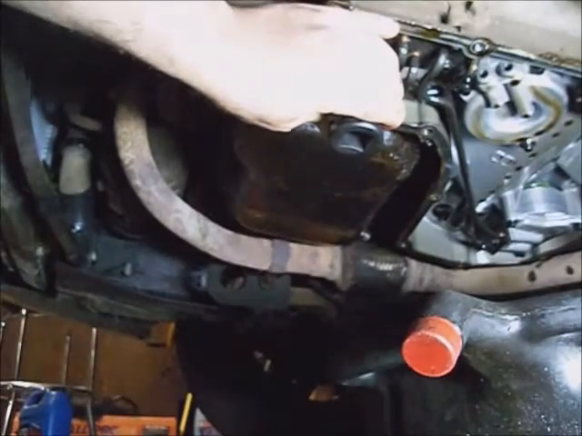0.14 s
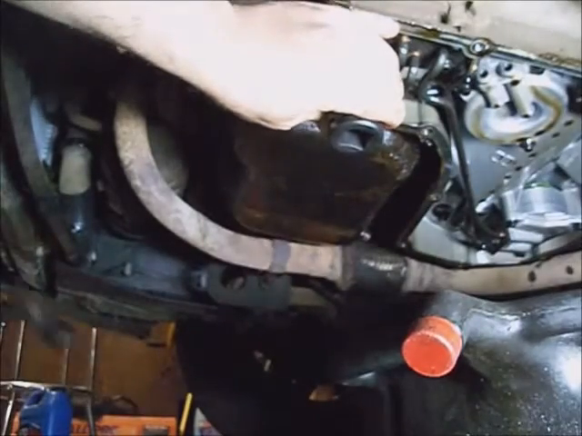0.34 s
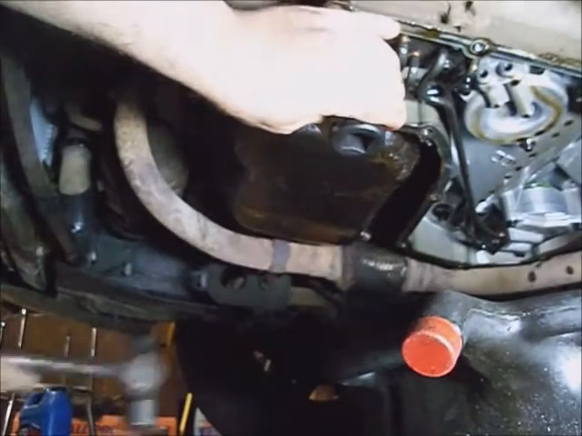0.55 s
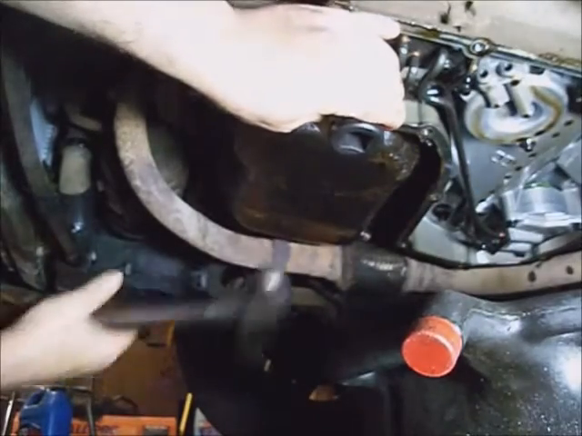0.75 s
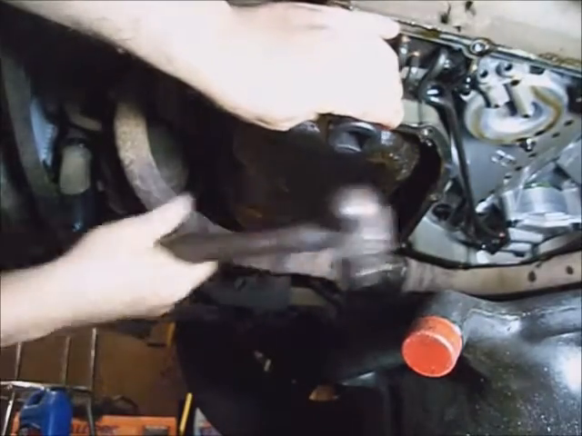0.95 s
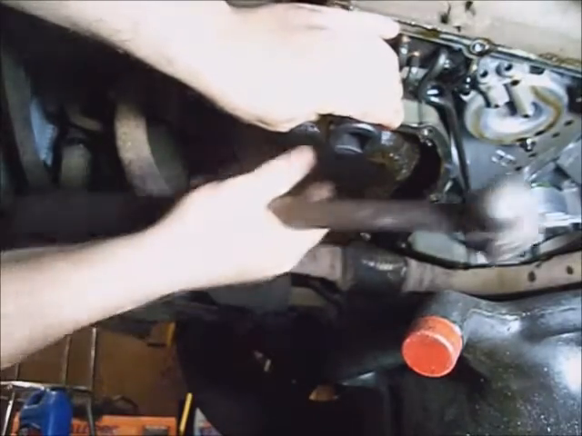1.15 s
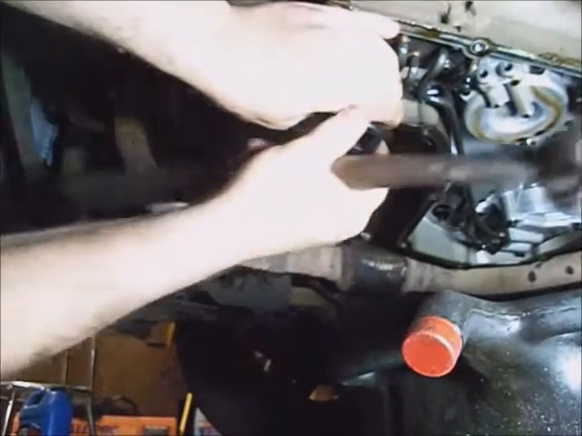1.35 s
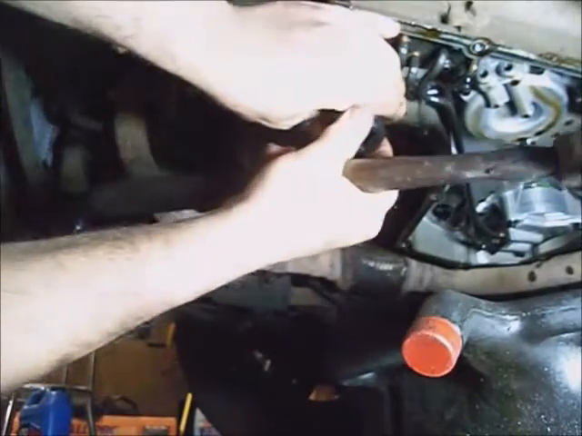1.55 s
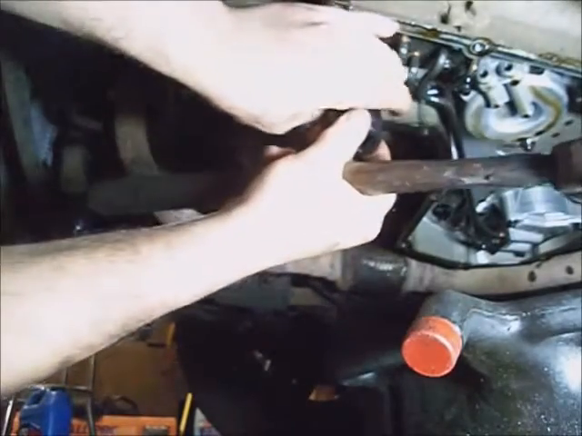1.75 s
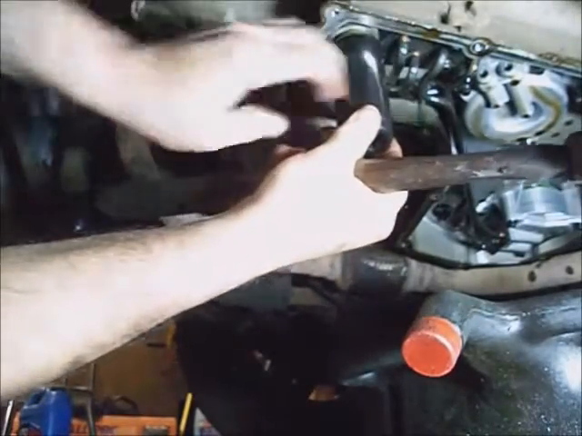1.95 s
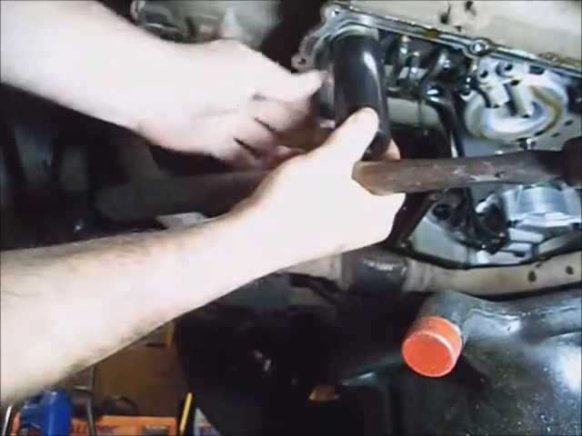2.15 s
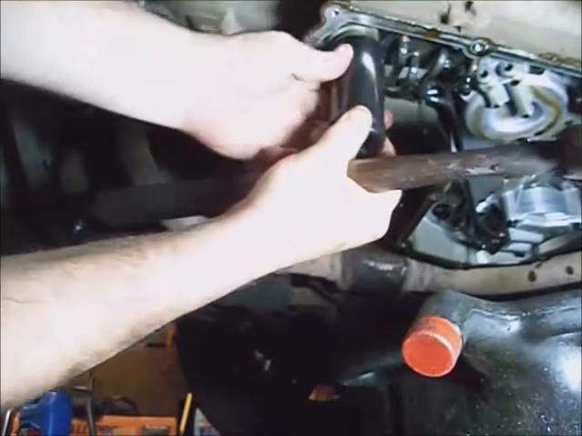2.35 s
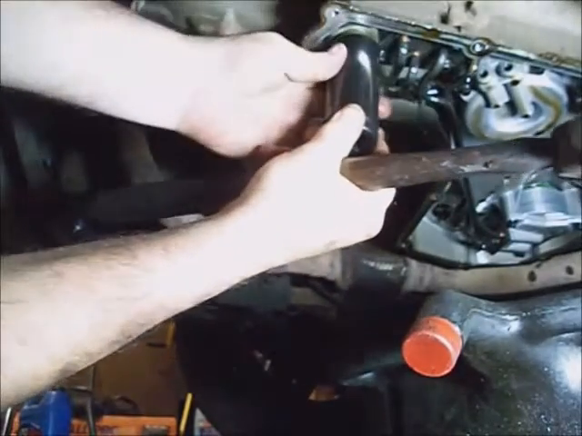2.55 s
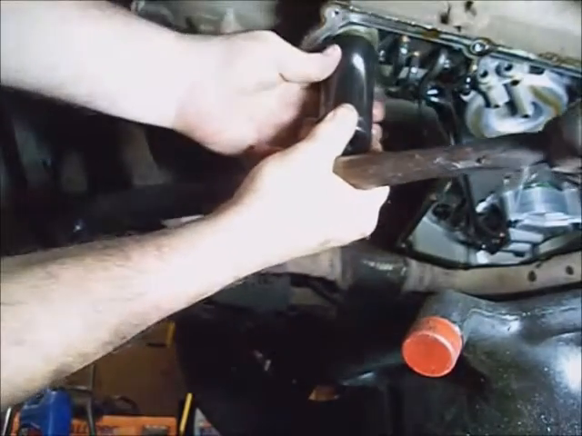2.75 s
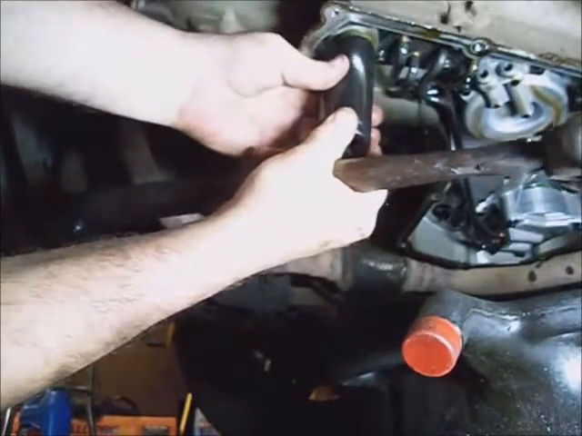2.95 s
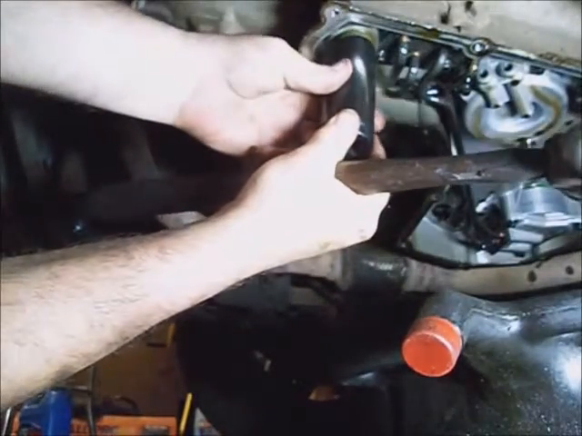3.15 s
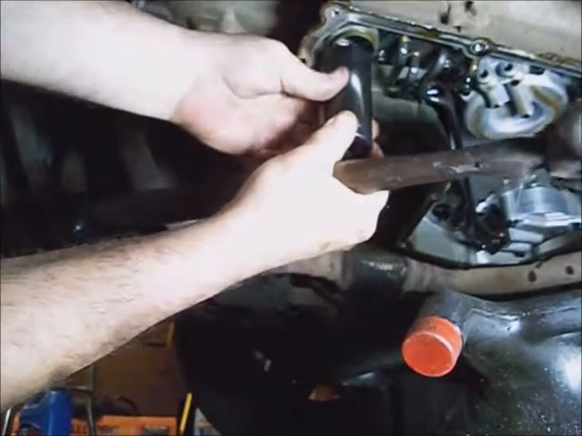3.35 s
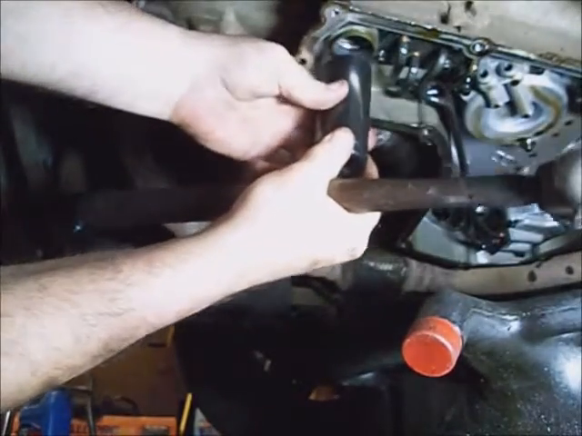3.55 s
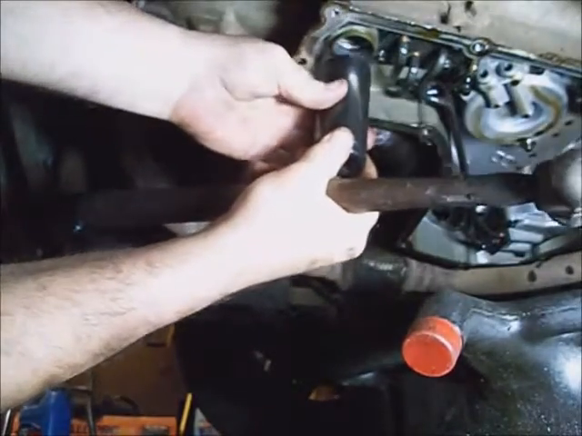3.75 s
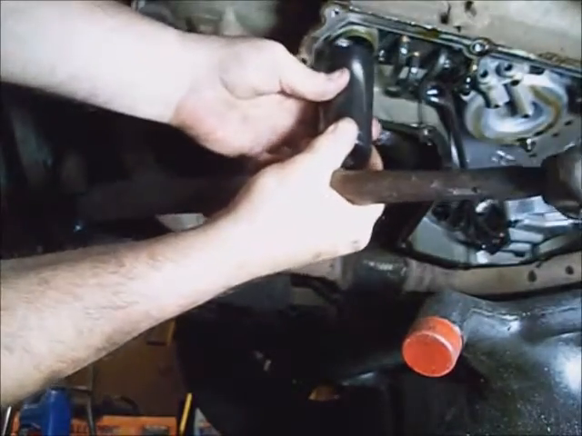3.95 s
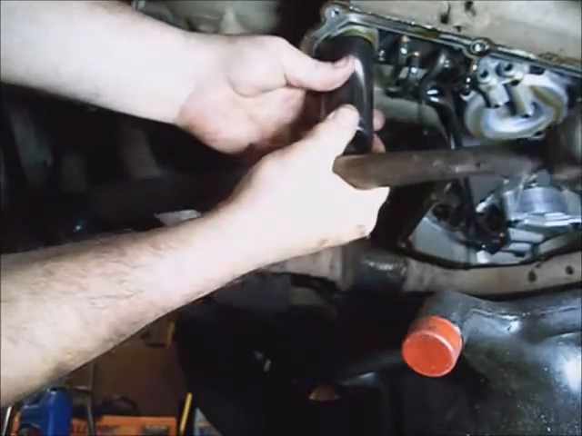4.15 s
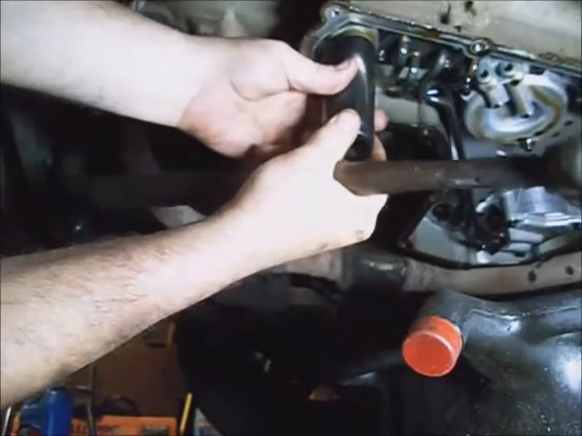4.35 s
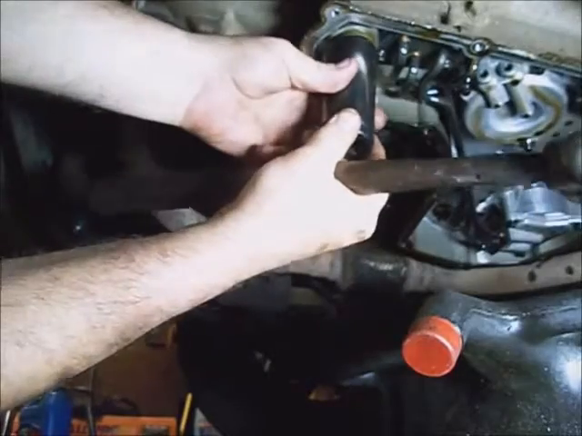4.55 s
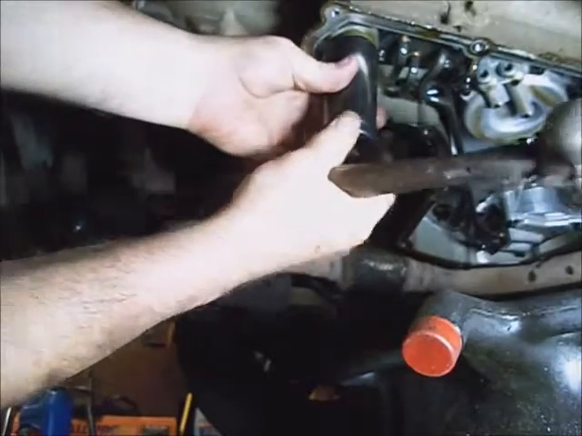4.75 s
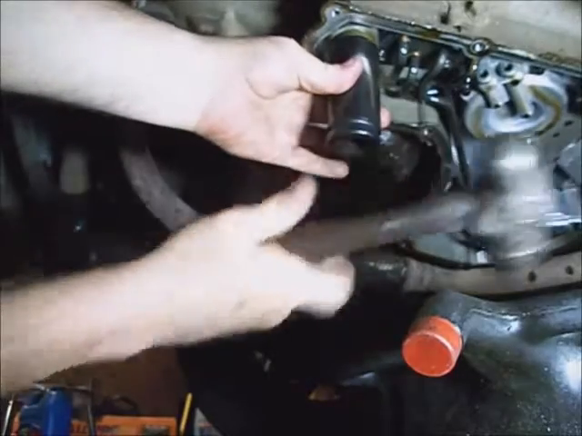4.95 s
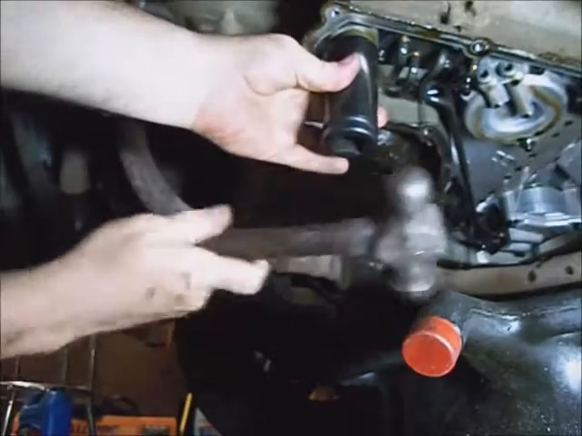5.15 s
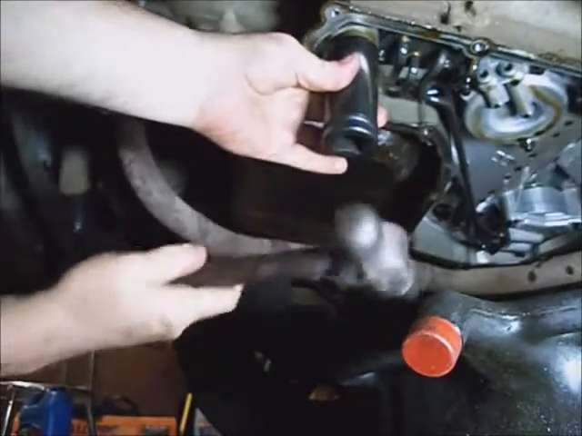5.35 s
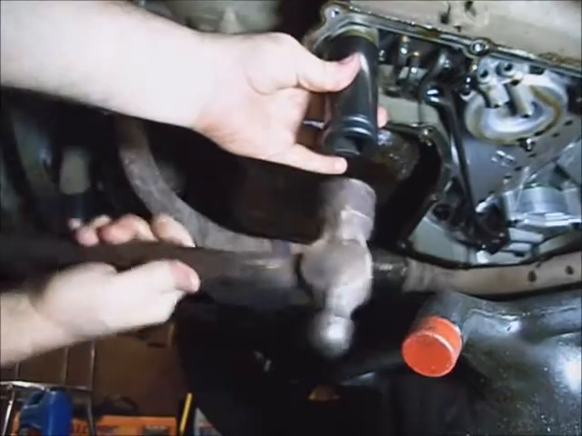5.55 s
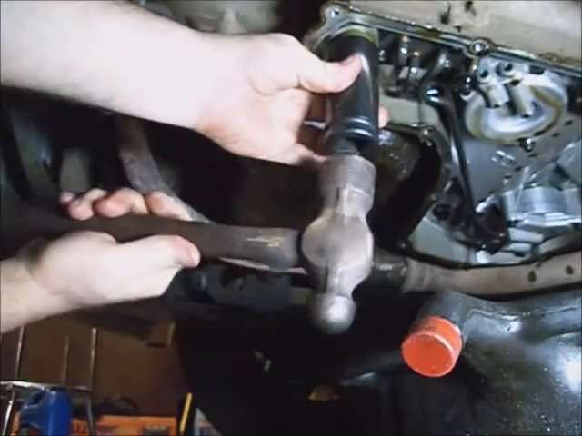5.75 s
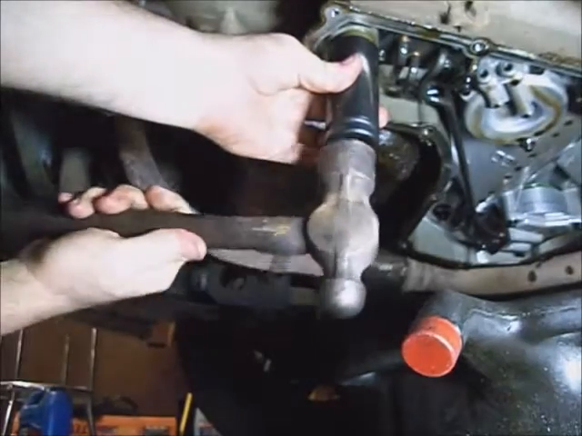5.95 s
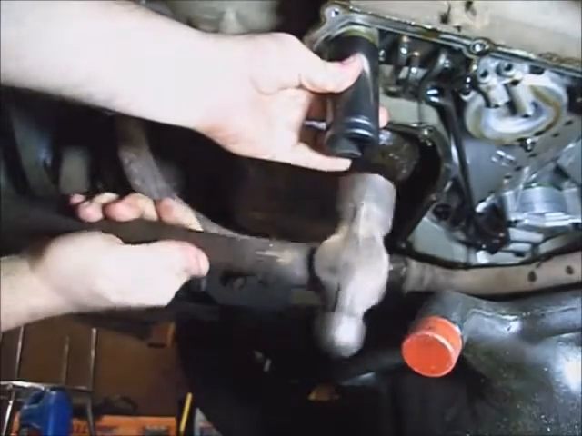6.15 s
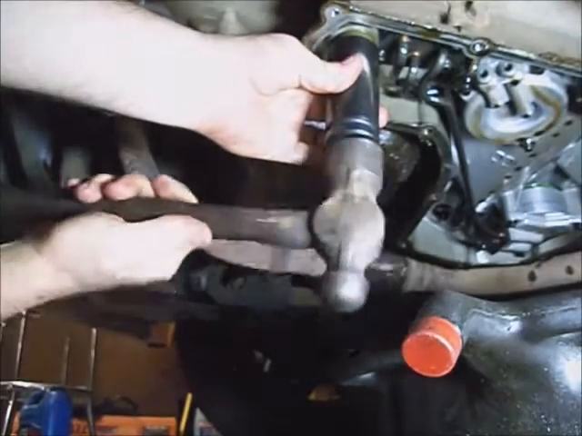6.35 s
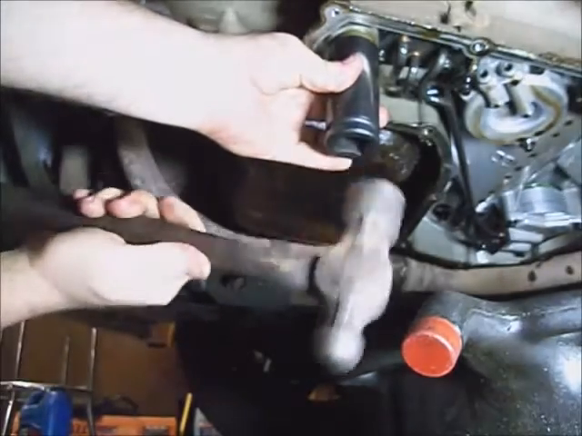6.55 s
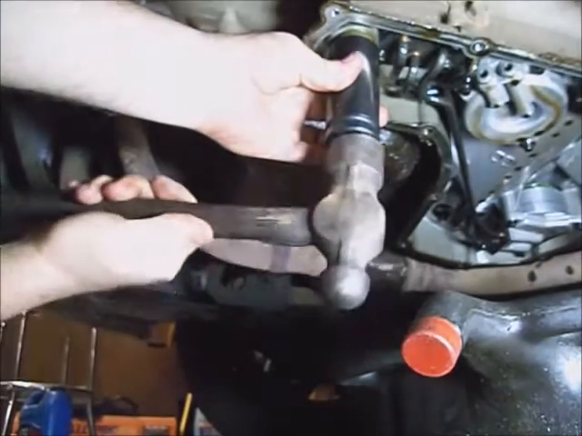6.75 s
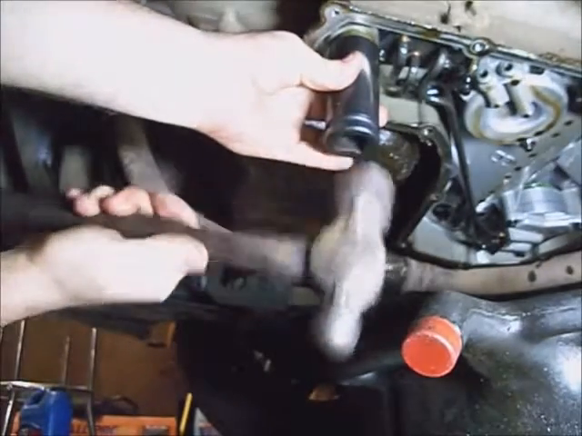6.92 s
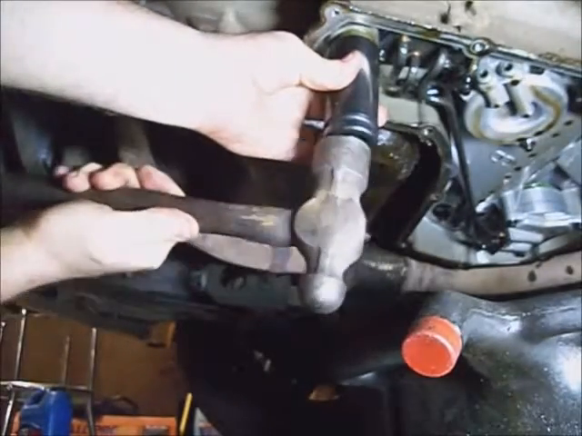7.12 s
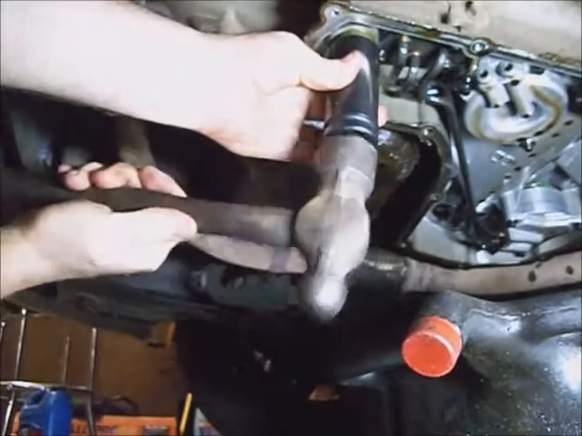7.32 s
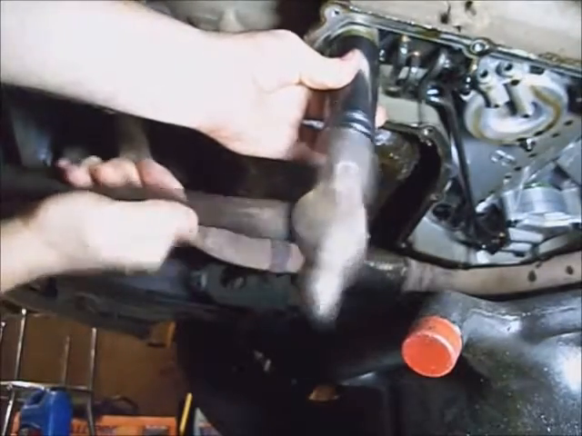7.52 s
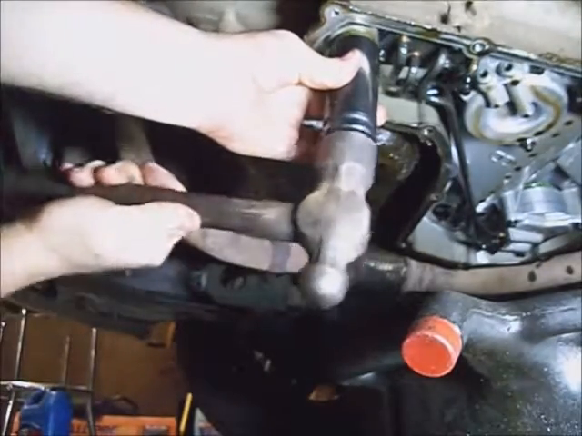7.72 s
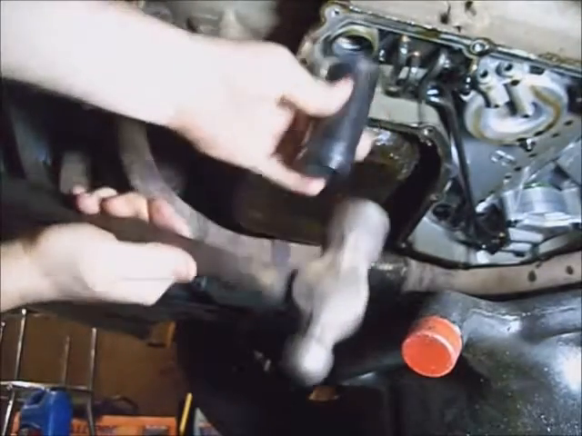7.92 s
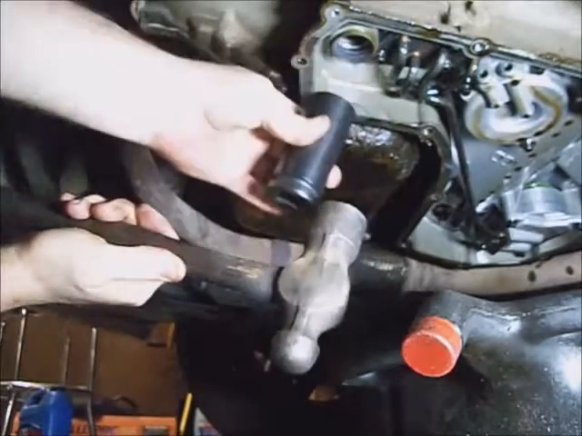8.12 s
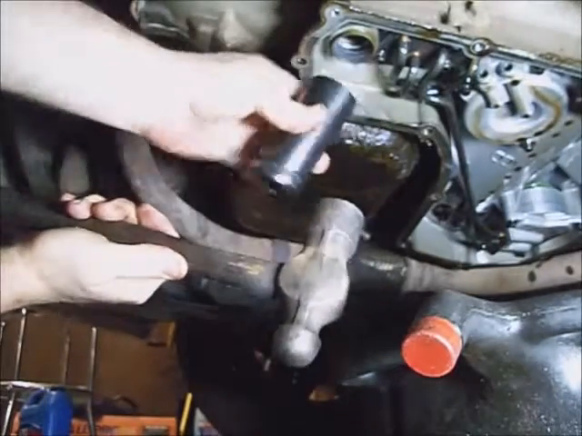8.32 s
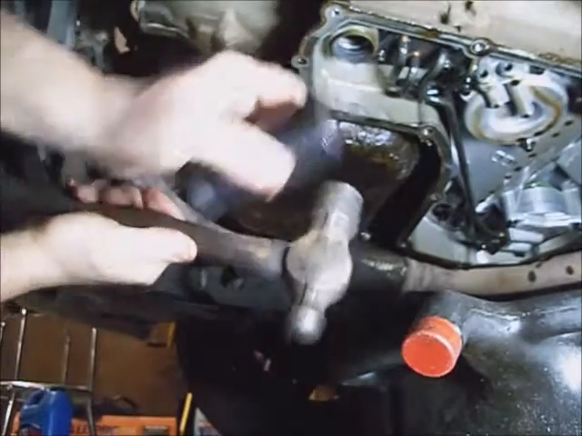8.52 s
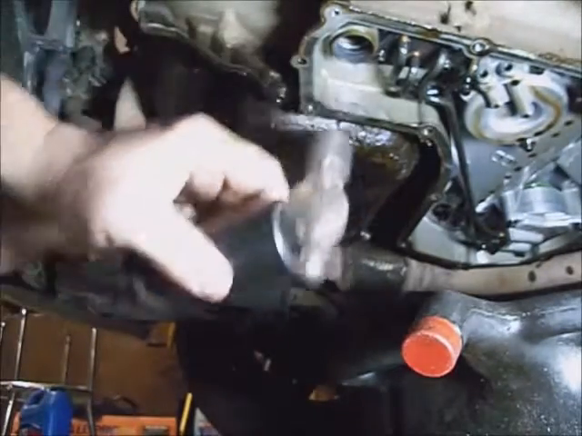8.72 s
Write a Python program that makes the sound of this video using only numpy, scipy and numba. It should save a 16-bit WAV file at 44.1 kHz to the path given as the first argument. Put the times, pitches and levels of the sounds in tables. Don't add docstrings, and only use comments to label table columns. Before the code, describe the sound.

Constant soft, band-limited hiss with a slightly resonant, boxy colour fills a garage, heard by a small close microphone. At about 0.3 s a tool knocks loudly on metal, rattling and bouncing for a tenth of a second while the car body shudders low; a dull bump follows at 0.6. From 0.6 to 3.3 s there are faint brushes of sleeves and hands, with tiny nudges near 1.4, 2.1, 2.6 and 3.0. A clearer short tap comes at 4.2, with light rubbing after. At 5.2 a strong, low panel thud. Then four hammer blows on a steel socket: 6.4 clacky and bright, 6.75 more ringing, 7.2 harder, 7.6 firmest and sharpest, all short, overloaded, with brief room echo. A small light clink at 8.2, a barely audible touch at 8.6, and hiss to the end.

```python
import sys
import numpy as np
from scipy import signal
from scipy.fft import rfft, irfft, next_fast_len
from scipy.io import wavfile
from scipy.ndimage import uniform_filter1d
from numba import njit

SR = 44100
rng = np.random.default_rng(int(sys.argv[2]) if len(sys.argv) > 2 else 0)


def put_to_file(sound):
    columns = np.atleast_2d(sound).T
    safe = np.clip(columns, -1, 1)
    whole_steps = np.round(safe * 32767)
    wavfile.write(sys.argv[1], SR, whole_steps.astype(np.int16))


def convert_level_to_amplitude(level_db):
    exponent = np.asarray(level_db, float) / 20
    return 10 ** exponent


N = 387198

# (frequency [Hz], level [dB per Hz])
HISS_SPECTRUM = [(15, -46.5), (40, -17.5), (91, -9.5), (206, -16), (303, -21.5), (626, -16.5), (800, -20),
                 (1500, -17), (1800, -19.5), (3200, -12.5), (3700, -5.5), (5700, -6.5), (6000, -14),
                 (6350, -54.5)]
# (centre [Hz], width [Hz], level [dB])
CASE_RESONANCES = [(1045, 200, 11), (2660, 220, 6), (3090, 64, 4.5), (3257, 47, 0), (3840, 110, 5),
                   (3925, 50, -8), (4140, 160, 7.5), (4306, 56, 7.5), (4525, 140, 6.5), (4720, 52, 5),
                   (4866, 90, -3), (5166, 60, 7.5), (5264, 100, -4.5), (5230, 54, 5), (5510, 52, 6.5)]
# (time [s], level [dB])
HISS_DRIFT = [(0.0, -44), (0.7, -46), (4.8, -46.5), (6.2, -45.5), (7.2, -46), (8.78, -45.5)]
# (start [s], length [s], level [dB])
BRUSH_STROKES = [(0.592, 0.21, -56), (1.078, 0.56, -52), (2.12, 0.56, -54.5), (3.002, 0.255, -57.5),
                 (4.3, 0.27, -61)]
# (band centre [Hz], t60 [s], level [dB])
ROOM_BANDS = [(45, 0.9, -7.5), (150, 0.43, -8), (398, 0.34, -5.5), (950, .4, -6), (2000, .3, -9),
              (4200, 0.16, -11)]

# (frequency [Hz], level [dB], t60 [s])
NUDGE_MODES = [(200.5, -16.5, 0.05), (290, -15, 0.15), (397.8, -15, 0.14), (529, -8.5, 0.12),
               (637, -8, 0.08), (810, -8.5, 0.061), (883, -5, 0.039), (1024, -6.5, 0.096),
               (1260, -9, 0.042), (1813, -9, 0.03), (2328, -12, 0.037)]
TOOL_MODES = [(90.2, -30, .3), (186.6, -24.5, 0.42), (248.7, -15.5, 0.14), (385, -6, .07), (621, -1, 0.045),
              (807, -3, 0.05), (1030, -5, 0.044), (1293, -1.5, 0.0404), (1620, -10.5, .03),
              (1952, -6.5, .035), (2356, -9, 0.0347), (2770, -13, 0.03), (3710, -10, .025),
              (4160, -12, 0.023), (4450, -10.5, 0.026), (5157, -12, .02), (5648, -15.5, .02)]
PANEL_MODES = [(59.7, -21, 0.22), (91, -7, .26), (138.3, -11.5, 0.25), (216.2, -0.5, 0.11),
               (255.6, 0, 0.04), (380, -17, 0.08), (537, -26.5, 0.085), (706, -22.5, 0.048),
               (930, -29.5, .05), (1400, -29, 0.033), (2590, -26.5, 0.033), (3770, -26.5, 0.033)]
TILTED_MODES = [(110.4, -22.5, .12), (214, -12, 0.085), (560, -10, 0.073), (881, -3, 0.065),
                (1004, -5.5, 0.051), (1395, -4.5, 0.035), (1720, -7, 0.036), (2140, 0, 0.024),
                (2350, 1, 0.026), (2625, -1, 0.044), (2900, -11.5, 0.034), (3290, 1, 0.018),
                (3645, -5.5, 0.026), (3913, -0.5, 0.019), (4450, -15.5, 0.026), (5290, -9.5, 0.024)]
LOOSE_MODES = [(93.9, -27, 0.089), (168.8, -25, .1), (248, -19, 0.1), (397, -11, .08), (530, -6.5, .07),
               (698, -15, 0.17), (767, -11, .07), (870, -5.5, 0.12), (1054, -3, .07), (1130, -9.5, 0.069),
               (1180, 3, 0.06), (1786, -6.5, .05), (2140, -6, 0.046), (2482, -9.5, .05),
               (2667, -8.5, 0.056), (3008, -8.5, 0.048), (3400, -6.5, 0.032), (3936, -6, .04),
               (4470, -13, .04), (4900, -11.5, .03), (5350, -16.5, .03)]
SEATED_MODES = [(219.4, -28.5, 0.099), (249.6, -30.5, 0.14), (622, -22, 0.065), (789, -18, 0.05),
                (882, 1, 0.047), (965, -9, 0.17), (1013, 5.5, 0.04), (1144, -14, .06), (1320, -19.5, 0.023),
                (1803, -7.5, 0.038), (2150, -13.5, 0.043), (2480, -6, 0.036), (2730, -14.5, .025),
                (3070, -12.5, 0.024), (3573, -2.5, 0.015), (3889, -1.5, 0.015), (4423, -17, 0.033),
                (4880, -16.5, 0.029), (5344, -12.5, 0.03)]
CLINK_MODES = [(228, -28, 0.06), (840, -23, .06), (1070, -22.5, 0.061), (1860, -13.5, 0.065),
               (2120, -12, 0.063), (2280, -4.5, 0.033), (2647, -6, .06), (2860, -10, 0.055),
               (3000, -11, .04), (3370, -4, 0.016), (3800, -5.5, 0.024), (4240, -2, 0.0093)]

# (time [s], peak level [dB], chatter length [s], brightness [dB per octave])
NUDGE_CONTACTS = [
    (.036, -45.5, 0.0019, -14),
    (1.44, -42, .006, -1),
    (2.13, -44, 0.0074, -3),
    (2.629, -43.5, .008, -9),
    (2.974, -35, 0.0066, -2),
    (3.03, -43.5, .006, -1.5),
    (4.2328, -27.5, 0.0019, -1),
    (8.56, -47.5, .008, -9),
]
TOOL_CONTACTS = [
    (0.2851, 2, 0.002, .3),
    (.297, -16, 0.059, 0),
    (.317, -17, 0.0017, 2),
    (.347, -16, 0.0056, 1.5),
    (.385, -25, .004, 0),
]
PANEL_CONTACTS = [
    (5.1662, -3, 0.0012, 0),
    (3.25, -47, 0.0036, 0),
    (6.15, -50, 0.0027, 0),
    (.31, -24, 0.011, -1),
    (.37, -33, 0.015, -4.5),
    (.44, -43, .015, -4.5),
]
TILTED_CONTACTS = [
    (6.3681, -1, 0.004, -.5),
    (6.415, -34, .003, -8),
]
LOOSE_CONTACTS = [
    (6.7512, 0, 0.0036, 0.0088),
]
SEATED_CONTACTS = [
    (7.1865, 9, 0.0048, 0.5),
    (7.6305, 11, 0.0025, 2.5),
    (7.608, -33, .005, -6),
    (.575, -22.5, 0.0034, -8),
    (1.866, -31.5, 0.0037, -9),
    (5.2, -35.5, 0.005, -10),
]
CLINK_CONTACTS = [
    (8.1618, -11.5, 0.00088, 0.0068),
]
# (time [s], level [dB])
CONTACT_CRACKS = [
    (.286, -26),
    (5.166, -36),
    (6.3685, -24),
    (6.7515, -18),
    (7.187, -18),
    (7.631, -17),
]


def band(x, lo_hz, hi_hz):
    return signal.sosfilt(signal.butter(2, [lo_hz, min(hi_hz, .45 * SR)], "band", fs=SR, output="sos"), x)


def unit(x):
    return x / np.sqrt(np.mean(x ** 2))


def walk(rate_hz):
    hold = int(SR / rate_hz)
    steps = np.repeat(rng.standard_normal(N // hold + 1), hold)
    return uniform_filter1d(steps, hold // 2)[:N]


def hiss():
    size = next_fast_len(N)
    f = np.maximum(np.fft.rfftfreq(size, 1 / SR), 1)
    hz, db = np.transpose(HISS_SPECTRUM)
    case_db = sum(peak_db / (1 + (2 * (f - centre) / width) ** 2) for centre, width, peak_db in CASE_RESONANCES)
    colour_db = np.interp(np.log(f), np.log(hz), db) + case_db
    spectrum = rfft(rng.standard_normal(size)) * convert_level_to_amplitude(colour_db)
    noise = np.zeros(N)
    for lo_hz in 15 * 2. ** np.arange(9):
        octave = irfft(spectrum * (f >= lo_hz) * (f < 2 * lo_hz), size)[:N]
        noise += octave * convert_level_to_amplitude(0.97 * walk(9))
    drift_db = np.interp(np.arange(N) / SR, *np.transpose(HISS_DRIFT))
    return unit(noise) * convert_level_to_amplitude(drift_db + 0.66)


def shuffle():
    attack, fall_db = 0.16, 10.5
    t, strokes = np.arange(N) / SR, np.zeros(N)
    for start_s, length_s, level_db in BRUSH_STROKES:
        part = (t - start_s) / length_s
        swell = np.clip(np.minimum(part, 1 - part) / attack, 0, 1)
        strokes += convert_level_to_amplitude(level_db - fall_db * np.clip(part, 0, 1)) * swell
    rustle = unit(band(rng.standard_normal(N), 460, 640))
    return rustle * strokes * convert_level_to_amplitude(2.8 * walk(11) - 5.5)


def burst(start_s, level_db, t60_s, lo_hz, hi_hz):
    since = np.arange(N) / SR - start_s
    envelope = (since >= 0) * convert_level_to_amplitude(level_db - 60 * np.maximum(since, 0) / t60_s)
    return unit(band(rng.standard_normal(N), lo_hz, hi_hz)) * envelope


def rumble():
    return burst(.3, -44, 1.1, 20, 130)


def cracks():
    return sum(burst(s, level_db, .04, 1100, 6000) for s, level_db in CONTACT_CRACKS)


def garage(dry):
    t = np.arange(SR) / SR
    echo = np.zeros(SR)
    for hz, t60, level_db in ROOM_BANDS:
        decay = np.exp(-np.log(1000) * t / t60)
        noise = band(rng.standard_normal(SR), hz / 1.87, hz * 1.8)
        echo += convert_level_to_amplitude(level_db) * np.sqrt(1 / (SR * t60)) * 4 * decay * noise
    build_up = np.minimum(t / 0.0069, 1)
    return signal.fftconvolve(dry, echo * build_up)[:N]


@njit
def ringing(hz, gain, decay, fill, size):
    out = np.zeros(size)
    for k in range(len(hz)):
        turn = np.exp(2j * np.pi * hz[k] / SR - decay[k])
        fill_turn = turn * np.exp(-fill[k])
        full, unfilled = gain[k] + 0j, gain[k] + 0j
        for i in range(min(size, int(12 / decay[k]))):
            out[i] += (full - unfilled).imag
            full, unfilled = full * turn, unfilled * fill_turn
    return out


def struck(modes, contacts, scatter_db=1.5, swarm_db=-9, rise=1.0, opposed=True, jolt_db=-34,
           chatter=0.029, blunt=4.5, wet_db=0):
    out, main = np.zeros((2, N + SR)), np.array(modes, float).T
    main_hz, main_db, main_t60 = main
    t = np.arange(SR // 3) / SR
    jolt_s = .012
    jolt = convert_level_to_amplitude(jolt_db) * t / jolt_s * np.exp(1 - t / jolt_s)
    for s, level_db, chatter_s, bright_db in contacts:
        place = (np.arange(64) + rng.random(size=64)) / 64
        weak_hz = main_hz[0] * (main_hz[-1] / main_hz[0]) ** place ** .7
        weak_db = np.interp(weak_hz, main_hz, main_db) + swarm_db
        weak_t60 = np.interp(weak_hz, main_hz, main_t60)
        hz, db, t60 = np.hstack([main, [weak_hz, weak_db, weak_t60]])
        tilt_db = bright_db * np.log2(np.maximum(hz, 700) / 1000)
        gain = convert_level_to_amplitude(db + tilt_db + scatter_db * rng.standard_normal(hz.shape))
        gain = -gain * (-1.) ** (opposed * np.arange(len(hz)))
        decay = np.log(1000) / np.maximum(t60, .005) / SR
        fill = hz / rise / SR
        ring = np.array([ringing(hz, gain, decay * quick, fill, len(t)) for quick in (1., blunt)])
        push = rng.standard_normal(4096) ** 3 * np.exp(-t[:4096] / max(chatter_s, .0002)) * chatter
        push[0] = 1
        knock = signal.fftconvolve(ring, push[None])[:, :len(t)]
        start = int(s * SR)
        out[:, start:start + len(t)] += convert_level_to_amplitude(level_db) * (knock / np.abs(knock[0]).max() + jolt)
    return out[:, :N] * convert_level_to_amplitude(np.array([[0], [wet_db]]))


def nudges():
    return struck(NUDGE_MODES, NUDGE_CONTACTS, scatter_db=2.5, swarm_db=-8.5, chatter=.03, wet_db=3)


def tool_knocks():
    return struck(TOOL_MODES, TOOL_CONTACTS, swarm_db=-8, rise=0.3, jolt_db=-28, chatter=.05, wet_db=5)


def panel_thuds():
    return struck(PANEL_MODES, PANEL_CONTACTS, scatter_db=0.9, swarm_db=-17, rise=0.41, opposed=False,
                  jolt_db=-50.5, chatter=.02, blunt=3.1, wet_db=-6)


def clink():
    return struck(CLINK_MODES, CLINK_CONTACTS, swarm_db=-7.5, rise=.6, jolt_db=-44, chatter=0.018, wet_db=0)


def hammer_blows():
    tilted = struck(TILTED_MODES, TILTED_CONTACTS, scatter_db=1.05, swarm_db=-7.5, jolt_db=-37.5,
                    chatter=.03, wet_db=7)
    loose = struck(LOOSE_MODES, LOOSE_CONTACTS, scatter_db=0.7, swarm_db=-8.5, jolt_db=-30,
                   chatter=.015, wet_db=4.5)
    seated = struck(SEATED_MODES, SEATED_CONTACTS, scatter_db=1.07, swarm_db=-17, rise=.6, jolt_db=-46,
                    chatter=0.027, blunt=2.8, wet_db=-3)
    return tilted + loose + seated


def scene():
    background = hiss() + shuffle() + rumble()
    direct, to_room = nudges() + tool_knocks() + panel_thuds() + clink() + hammer_blows()
    return (background + direct + garage(to_room) + cracks())[None]


def thin_out(x):
    threshold_db, spread_db, patchy_db = -78, 3, 3
    f, t, z = signal.stft(x, SR, window="cosine", nperseg=1024)
    rate_hz = np.where((t > .5) & (t < 5.9), 10, .5)
    gaps = uniform_filter1d(1. * (rng.random(len(t)) < rate_hz * t[1]), size=2) > 0
    patches = np.repeat(rng.standard_normal((len(f) // 8 + 1, len(t))), 8, axis=0)[:len(f)]
    depth_db = spread_db * uniform_filter1d(rng.standard_normal(len(t)), size=2)
    depth_db = depth_db + patchy_db * uniform_filter1d(patches, size=2)
    threshold = convert_level_to_amplitude(threshold_db + depth_db) * gaps * (f[:, None] < 3600)
    return signal.istft(z * (np.abs(z) >= threshold), SR, window="cosine", nperseg=1024)[1][..., :N]


def top_cut(x):
    return signal.sosfilt(signal.butter(12, 6250, fs=SR, output="sos"), x)


def record(dry):
    overloaded = np.clip(dry, -1.02, 1.02)
    coupled = signal.sosfilt(signal.butter(1, 45, "high", fs=SR, output="sos"), overloaded)
    narrow = signal.sosfilt(signal.cheby2(12, 60, 6787.5, fs=SR, output="sos"), coupled)
    mix = np.clip(thin_out(narrow), -1, 1)
    return top_cut(mix)


dry = scene()
out = record(dry)
put_to_file(out)
```